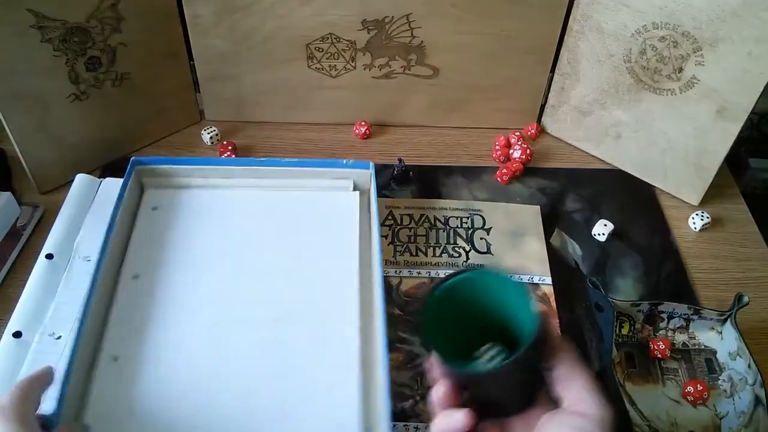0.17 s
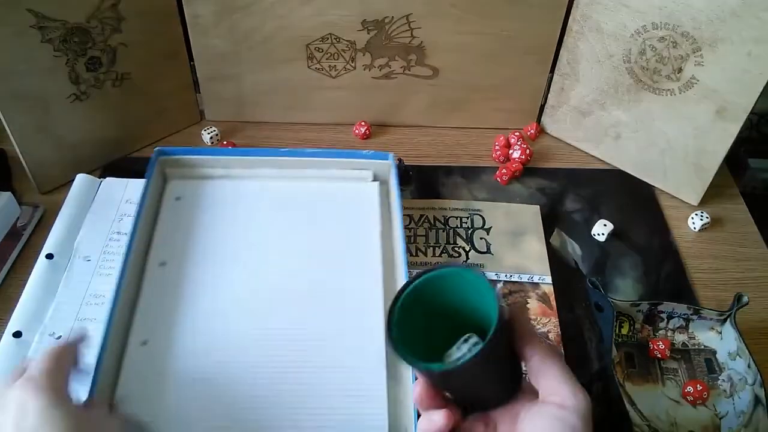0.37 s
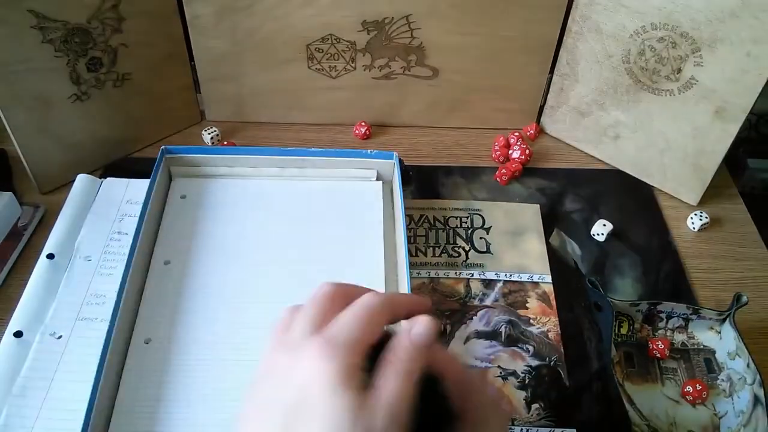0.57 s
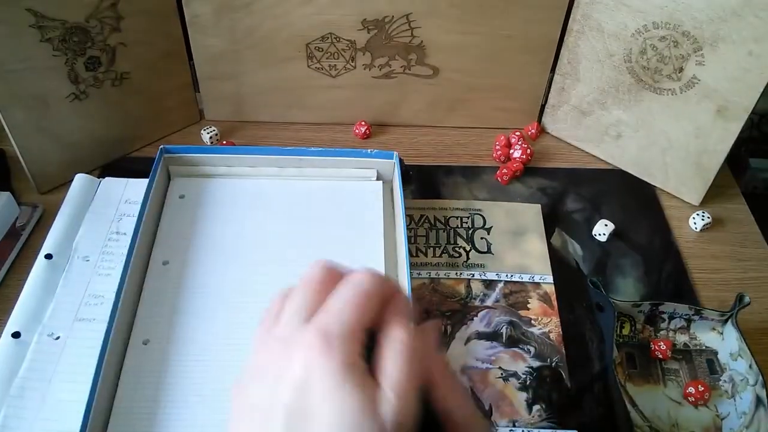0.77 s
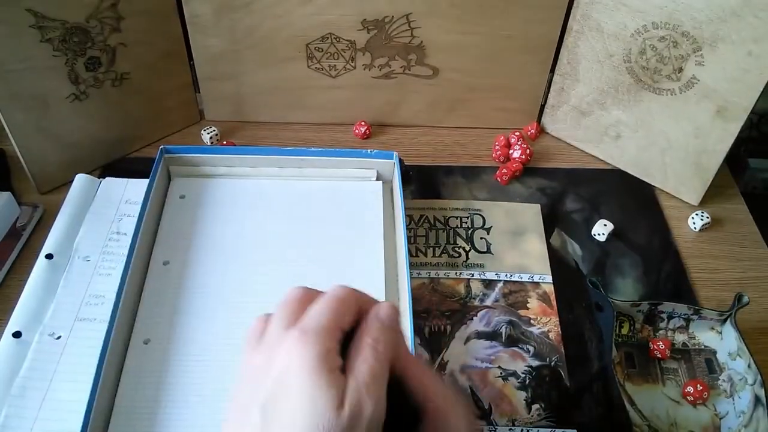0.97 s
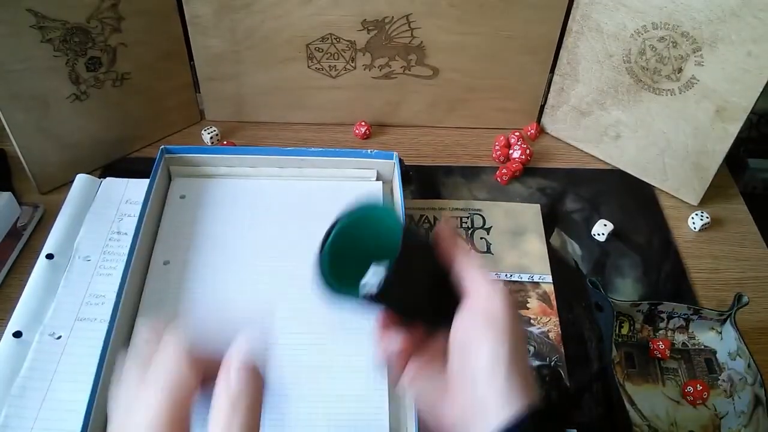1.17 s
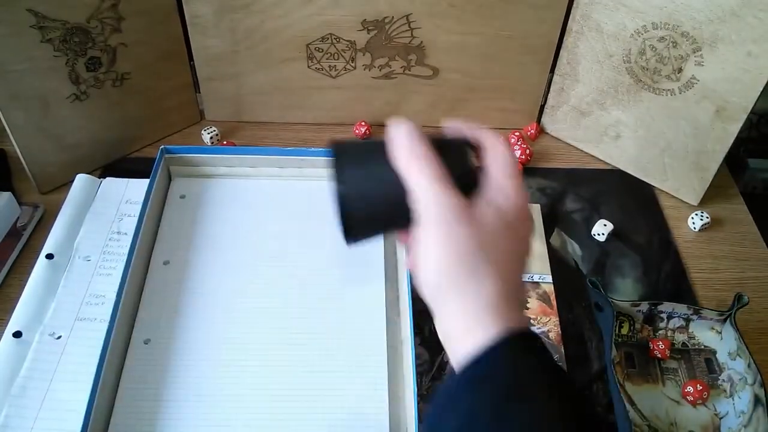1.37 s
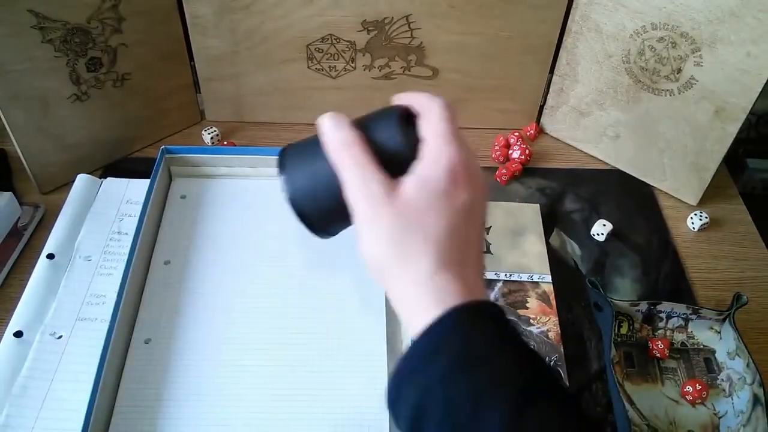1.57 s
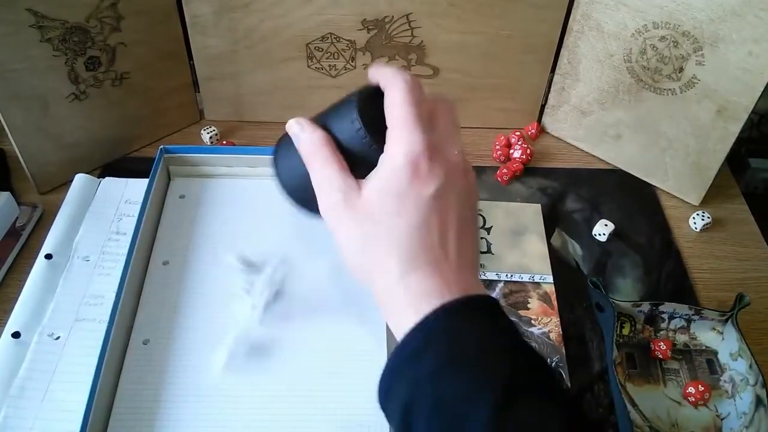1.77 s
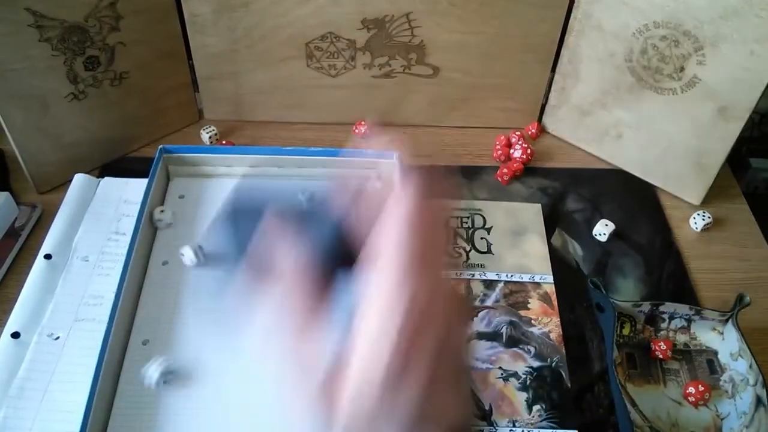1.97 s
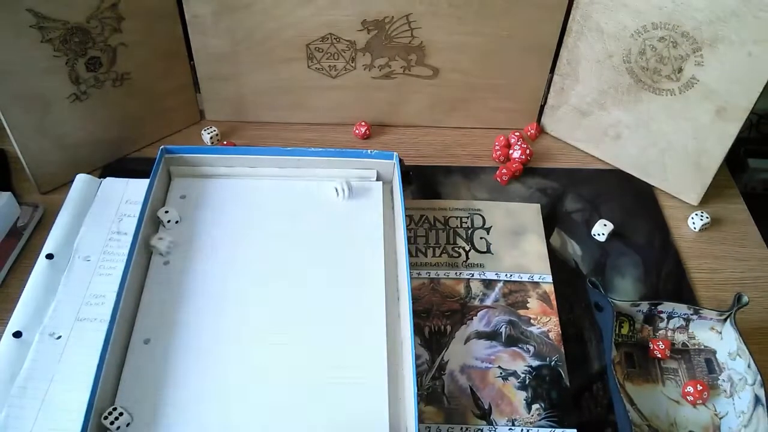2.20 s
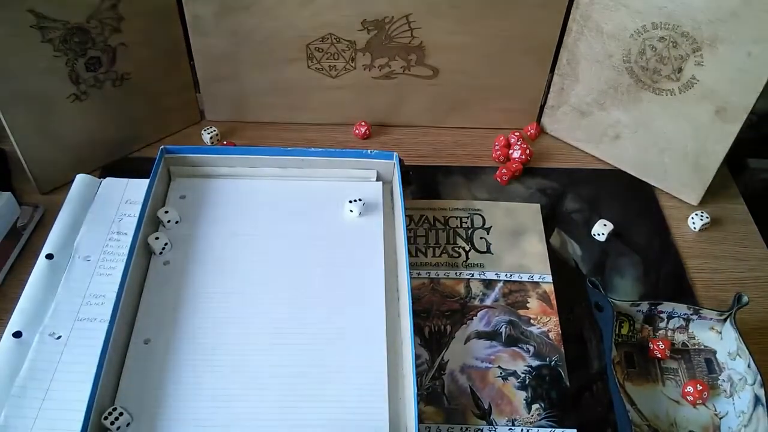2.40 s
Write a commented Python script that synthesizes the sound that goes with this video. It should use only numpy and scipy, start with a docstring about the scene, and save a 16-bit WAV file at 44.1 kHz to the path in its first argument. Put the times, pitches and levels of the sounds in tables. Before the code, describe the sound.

Dice rattle in a cup, then clatter into a cardboard box.

```python
"""Plastic dice slide and rattle in a hand-held cup, then are tipped into a cardboard box, where they
land, bounce and strike the walls. Each impact, on cup, box or another die, excites damped normal modes;
sliding drives the modes with a stream of tiny impulses. A palm over the cup lowers its air resonance.
A small quiet room reverberates, under a faint steady hiss."""
import sys
import numpy as np
from scipy import signal
from scipy.fft import rfft, irfft, next_fast_len
from scipy.io import wavfile
from scipy.ndimage import uniform_filter1d

SR = 44100
rng = np.random.default_rng(int(sys.argv[2]) if len(sys.argv) > 2 else 0)


def generate_wav(sig):
    """Save sig (samples, or channels by samples) to the path in sys.argv[1] as 16-bit PCM at SR."""
    pcm = np.round(np.clip(np.atleast_2d(sig).T, -1, 1) * 32767).astype(np.int16)
    wavfile.write(sys.argv[1], SR, pcm)


N = 107559


def amp(db):
    return 10 ** (np.asarray(db) / 20)


def unit_rms(x):
    return x / np.sqrt(np.mean(x ** 2) + 1e-20)


def along(points, hz):
    """Interpolation on a logarithmic frequency axis."""
    f, values = np.transpose(points)
    return np.interp(np.log(hz + 1), np.log(f + 1), values)


def envelope(rows):
    """Amplitude envelope, linear in decibels between points and silent after the last."""
    times, db = np.transpose(rows)
    return amp(np.interp(np.arange(N) / SR, times, db, right=-120))


def filtered(x, response):
    """Linear filtering: the spectrum is multiplied by a frequency response."""
    size = next_fast_len(N + SR // 2)
    return irfft(rfft(x, size) * response(np.fft.rfftfreq(size, 1 / SR)), size)[:N]


def impulses(per_s, spread_db):
    """Poisson process: tiny independent impacts of widely spread but bounded size."""
    size_db = spread_db * np.minimum(rng.exponential(size=N), 3)
    return (rng.random(N) < per_s / SR) * amp(size_db) * rng.choice([-1, 1], N)


def driven(drive, groups, width):
    """Forced vibration of modes damped by contact; width is bandwidth over natural frequency."""
    modes = [mode for group in groups for mode in group[-1]]
    def response(f):
        return sum((-1) ** k * amp(db) * 1j * f * width * hz / (hz * hz - f * f + 1j * f * width * hz)
                   for k, (hz, db) in enumerate(modes))
    return unit_rms(filtered(drive, response))


MODE_SCATTER_DB, DETUNE = 2.5, 0.014  # from contact to contact
BURST_DB, BURST_T60_S = 1.5, 0.0052  # the loud first instant of a blow
ROCK_S = 0.0024  # mean delay as a die rocks onto a second corner
def struck(hits, groups, rough, second_db):
    """Free decay of modes after two contacts a blow; rough is the phase wander in radians over a cycle."""
    out, t = np.zeros(N + SR), np.arange(SR // 10) / SR
    for onset, *levels in hits:
        for start, contact_db in (onset, 0), (onset + ROCK_S * (.5 + rng.random()), second_db):
            for level, (t60, rise, modes) in zip(levels, groups):
                hz, db = np.transpose(modes)[..., None]
                walk = np.cumsum(rng.standard_normal((len(hz), len(t))), axis=1)
                two_cycles = int(2 * SR / hz.max())
                walk = uniform_filter1d(uniform_filter1d(walk, two_cycles), two_cycles)
                detuned = hz * (1 + DETUNE * rng.standard_normal(hz.shape))
                phase = 2 * np.pi * detuned * t + rough * np.sqrt(hz / SR) * walk
                waves = amp(db + MODE_SCATTER_DB * rng.standard_normal(hz.shape)) * np.sin(phase)
                attack = 1 - np.exp(-(t / rise) ** 2)
                decay = amp(-60 * t / t60) + amp(BURST_DB - 60 * t / BURST_T60_S)
                ring = attack * decay * waves.sum(axis=0)
                out[round(start * SR):][:len(t)] += amp(level + contact_db) * ring
    return out[:N]


# Spectrum of the hiss: (frequency [Hz], relative density [dB])
HISS_SPECTRUM = [(30, -21.5), (250, -14.5), (1000, -6), (2000, -10.5), (5000, -14), (8700, -14),
                 (13800, -3.5), (16000, -5)]
def hiss():
    """Stationary noise: white noise coloured by a fixed spectrum."""
    return unit_rms(filtered(rng.standard_normal(N), lambda hz: amp(along(HISS_SPECTRUM, hz))))


# Dice sliding along the cup wall: (time [s], level [dB])
SCRAPE_LEVEL = [(.032, -95), (.04, -54.5), (.15, -55.5), (.3, -62), (.62, -78), (.8, -40.5), (.97, -57),
                (1.2, -66.5), (1.3, -84)]
def scrape():
    """Sliding friction: dense micro-impacts drive the upper modes of cup and dice."""
    wall = driven(impulses(per_s=4100, spread_db=5.5), cup_modes(0)[1:], width=0.043)
    dice = driven(impulses(per_s=4100, spread_db=5.5), DIE_MODES[1:], width=0.2)
    return envelope(SCRAPE_LEVEL) * (wall + amp(-8.5) * dice)


# Cup modes, low to high group: (T60 [s], rise [s], list of (frequency [Hz], level [dB]))
CUP_MODES = [(0.024, 0.0028, [(450, 5.5), (560, 9.5)]), (0.031, 0.001, [(1150, 0)]),
             (0.022, 0.00059, [(1600, -6.5), (1850, -2.5), (2050, -5.5), (2350, -9.5), (2750, -11),
             (3250, -13), (4000, -22.5)])]
# Air resonance of the cup: (time [s], frequency [Hz])
AIR_PITCH = [(.3, 987), (.44, 935), (.47, 793), (.9, 797), (.98, 942)]
AIR_DB = 7.5
def cup_modes(time):
    """Cavity resonance: an air mode, lower while a palm covers the mouth, joins the middle group."""
    low, (t60, rise, modes), high = CUP_MODES
    air_hz = np.interp(time, *np.transpose(AIR_PITCH))
    return [low, (t60, rise, [(air_hz, AIR_DB)] + modes), high]


# Dice striking the cup: (time [s], low-mode level [dB], middle-mode level [dB], high-mode level [dB])
CUP_IMPACTS = [(0.038, -58.5, -67, -48.5), (0.198, -40.5, -43, -47), (0.231, -47, -40.5, -51),
               (0.266, -73, -42, -89), (0.418, -46.5, -50.5, -57), (0.459, -59.5, -50, -79),
               (0.538, -41.5, -35, -35), (0.653, -50.5, -54.5, -53), (0.696, -25.5, -32, -29),
               (0.709, -31.5, -32.5, -38.5), (0.736, -21, -27.5, -6.5), (0.752, -20.5, -41.5, -10),
               (0.7695, -25, -38.5, -26.5), (0.843, -31.5, -25.5, -11), (0.854, -28.5, -31, -30.5),
               (0.878, -39, -31, -22.5), (0.9207, -43, -36.5, -24.5), (0.992, -52, -39.5, -53),
               (1.005, -54.5, -33, -21.5), (1.457, -82.5, -66.5, -71.5)]
def cup_knocks():
    """Impact excitation: each blow rings the cup wall and the air inside it."""
    return sum(struck([hit], cup_modes(hit[0]), rough=0.55, second_db=-5.5) for hit in CUP_IMPACTS)


# Faint ticking between dice: (time [s], level [dB])
CHATTER_LEVEL = [(0, -98), (.15, -59.5), (.22, -47), (.3, -58), (.64, -64), (.7, -47), (.9, -43),
                 (.97, -56.5), (1.05, -54.5), (1.2, -82.5), (1.37, -84.5), (1.44, -61), (1.52, -73)]
def chatter():
    """Shot noise: random light contacts drive the modes of the dice."""
    lower = driven(impulses(per_s=500, spread_db=4), DIE_MODES[:1], width=0.048)
    upper = driven(impulses(per_s=500, spread_db=4), DIE_MODES[1:], width=0.32)
    return envelope(CHATTER_LEVEL) * (lower + amp(-6) * upper)


# Die modes, low and high group: (T60 [s], rise [s], list of (frequency [Hz], level [dB]))
DIE_MODES = [(0.016, 0.00058, [(2500, -19.5), (4150, -18.5), (4900, -13), (5600, -7.5), (6500, -11),
             (7600, -13.5)]), (0.0029, 0.00069, [(9000, -5), (9700, -6.5), (10500, -5.5), (11500, -5),
             (12500, -6.5), (13300, -0.5), (14500, -7)])]
# Die striking die: (time [s], level below 8 kHz [dB], level above 8 kHz [dB])
DIE_IMPACTS = [(0.1446, -32.5, -39), (0.177, -48, -27.5), (0.1992, -23.5, -23), (0.2044, -21.5, -20),
               (0.2636, -31.5, -41), (0.285, -33.5, -83), (0.3335, -30, -31), (0.3714, -36, -42),
               (0.4235, -28.5, -27.5), (0.54, -30, -41), (0.6564, -32, -30), (0.699, -28, -22),
               (0.7055, -22, -29), (0.725, -27, -34), (0.7565, -20.5, -36), (0.8006, -26.5, -55),
               (0.824, -30, -55), (0.834, -31.5, -49), (0.8641, -15.5, -30), (0.907, -25.5, -25.5),
               (0.9904, -29.5, -60), (1.0049, -15.5, -23), (1.3824, -43, -74), (1.4416, -41, -71),
               (1.4693, -44, -67), (1.56, -44, -45), (1.5745, -12.5, -18.5), (1.5885, -19.5, -36),
               (1.5975, -25.5, -53), (1.6395, -11, -4.5), (1.6472, -21, -17.5), (1.7638, -30, -39),
               (1.798, -27.5, -39), (1.897, -26, -35.5)]
def die_clicks():
    """Collision of small stiff bodies: their high natural frequencies die away as a click."""
    return struck(DIE_IMPACTS, DIE_MODES, rough=1.11, second_db=-3.5)


# Box floor modes, low and middle group: (T60 [s], rise [s], list of (frequency [Hz], level [dB]))
FLOOR_MODES = [(0.055, 0.0017, [(335, -4.5), (380, 0), (440, -3.5)]), (0.024, 0.00087, [(710, 1),
               (830, 5.5), (920, 4.5), (1200, -3)])]
# Dice landing in the box: (time [s], low-mode level [dB], middle-mode level [dB])
FLOOR_IMPACTS = [(1.56, -9.5, -22.5), (1.574, -23.5, -35), (1.59, -12, -32.5), (1.607, -24, -27.5),
                 (1.631, -11.5, -19.5)]
def floor_thuds():
    """Plate vibration: falling dice excite the low modes of the hollow box floor."""
    return struck(FLOOR_IMPACTS, FLOOR_MODES, rough=0.35, second_db=-15.5)


# Box wall modes, low to high group: (T60 [s], rise [s], list of (frequency [Hz], level [dB]))
WALL_MODES = [(0.092, 0.00028, [(530, -7.5)]), (0.066, 0.00021, [(960, -14), (1110, -1.5), (1290, -10.5)]),
              (0.014, 0.00032, [(1470, -9.5), (1950, -3.5), (2500, -11), (2950, -8), (3400, -26)])]
# Dice striking the walls: (time [s], low-mode level [dB], middle-mode level [dB], high-mode level [dB])
WALL_IMPACTS = [(1.763, -14.5, -21.5, -9), (1.797, -20, -13, -5.5), (1.866, -24, -27.5, -18),
                (1.8965, -20.5, -11.5, -5), (2.017, -41.5, -41, -57), (2.067, -43, -42, -49)]
def wall_knocks():
    """Modal damping: the struck cardboard walls ring briefly, their highest modes dying first."""
    return struck(WALL_IMPACTS, WALL_MODES, rough=0.6, second_db=-10.0)


LOW_CUT_HZ, LEAK_DB = 317, -18
def radiation(hz):
    """Radiation efficiency: small bodies emit little bass, a fourth-order high-pass with a faint leak."""
    s = 1j * hz / LOW_CUT_HZ
    return (s * s / (s * s + np.sqrt(2) * s + 1)) ** 2 + amp(LEAK_DB)


# Reverberation time of the room: (frequency [Hz], T60 [s])
ROOM_T60 = [(300, 0.27), (1000, 0.21), (3000, 0.18), (8000, 0.23), (15000, 0.043)]
def room(x):
    """Diffuse reverberation: each slice of sound gets a fresh noise tail whose decay varies with pitch."""
    step, predelay = SR // 20, 200  # samples
    out, x, window = np.zeros(N + 2 * SR), np.pad(x, (0, 2 * step)), np.hanning(2 * step)
    for i in range(0, N, step):
        hz, t, noise = signal.stft(rng.standard_normal(SR // 2), SR, nperseg=256)
        decay = amp(-60 * t / along(ROOM_T60, hz)[:, None])
        tail = signal.istft(noise * decay, SR, nperseg=256)[1]
        wet = signal.fftconvolve(x[i:i + 2 * step] * window, tail / np.linalg.norm(tail))
        out[i + predelay:][:len(wet)] += wet
    return out[:N]


ROOM_DB, HISS_DB = -7.5, -67.5
def scene():
    """Superposition: direct sound, reverberation and hiss add in one channel."""
    vibration = scrape() + cup_knocks() + chatter() + die_clicks() + floor_thuds() + wall_knocks()
    direct = filtered(vibration, radiation)
    return (direct + amp(ROOM_DB) * room(direct) + amp(HISS_DB) * hiss())[None]


TOP_HZ = 15950
def record(dry):
    """Band limiting: a very steep low-pass removes the highest treble."""
    return filtered(dry[0], lambda hz: 1 / (1 + (hz / TOP_HZ) ** 160))[None]


dry = scene()
out = record(dry)
generate_wav(out)
```